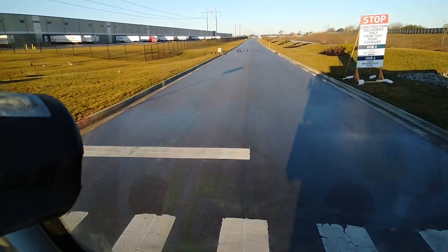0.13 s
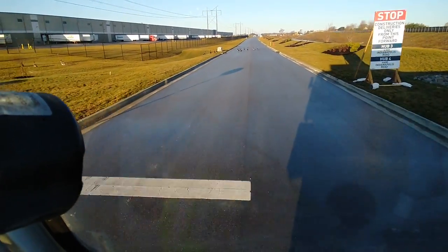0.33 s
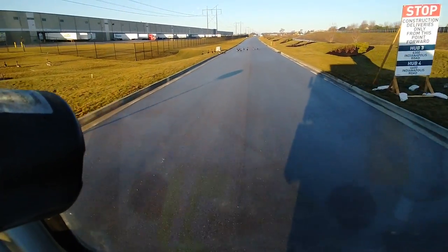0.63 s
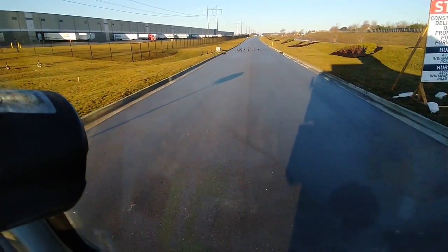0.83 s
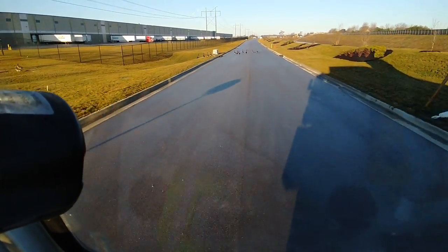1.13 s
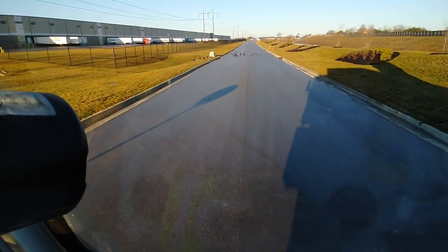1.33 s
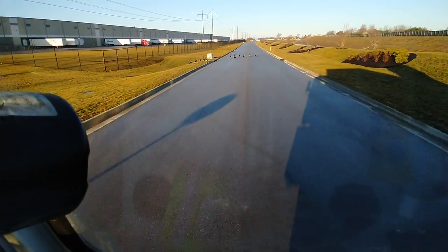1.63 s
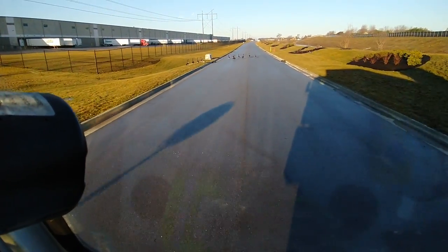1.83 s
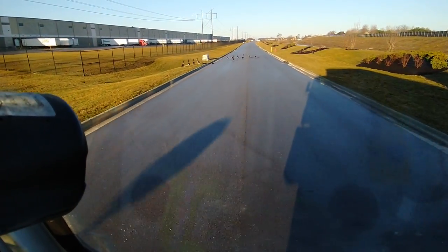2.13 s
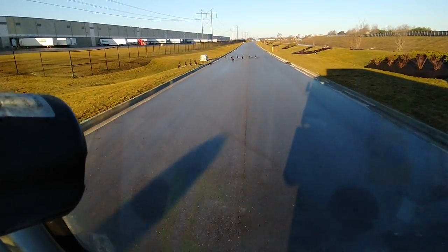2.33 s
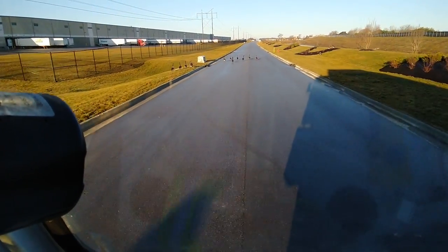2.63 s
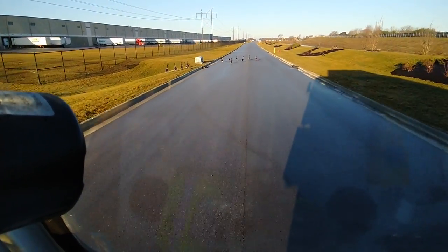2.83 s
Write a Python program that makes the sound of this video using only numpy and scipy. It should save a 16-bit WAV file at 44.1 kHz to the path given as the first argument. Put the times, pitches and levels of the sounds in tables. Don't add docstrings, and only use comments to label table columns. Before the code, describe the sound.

A heavy vehicle's engine drones inside its cab, pitch creeping upward for three seconds over bassy tyre rumble, rattly valve clatter and dull bump booms. Leaking air hisses strongly at 0 s, fades, and gusts again near 1.1 s as a floor panel buzzes. Tiny squeaks come at 0.2 and 0.6-0.7 s. From 2 s seal air whistles faintly louder; trim creaks at 2.1-2.6 s; squeaks return at 2.9 s.

```python
import sys
import numpy as np
from scipy import signal
from scipy.fft import rfft, irfft
from scipy.io import wavfile
from scipy.ndimage import uniform_filter1d

SR = 44100
rng = np.random.default_rng(int(sys.argv[2]) if len(sys.argv) > 2 else 0)


def generate_wav(sig):
    pcm = np.round(np.clip(np.atleast_2d(sig).T, -1, 1) * 32767).astype(np.int16)
    wavfile.write(sys.argv[1], SR, pcm)


def ratio(d):
    e = np.asarray(d, float) / 20
    return 10 ** e


N = 130977

# time in seconds, level in dB.
LEAK_GUSTS = [(0, -37.5), (.1, -45.5), (.3, -48), (.6, -55), (.76, -48), (.98, -51.5), (1.06, -40),
              (1.17, -41), (1.24, -48), (1.34, -43), (1.5, -47), (1.75, -50), (2.0, -49), (2.07, -47),
              (2.4, -48), (2.97, -54)]
# frequency in Hz, density in dB per Hz.
LEAK_SPECTRUM = [(1500, -7), (3000, 1.5), (4500, -2), (6000, -4.5), (7300, -11), (8600, -9.5)]
# start in seconds, length in seconds, level in dB, frequency in Hz.
BUMPS = [(.08, 0.14, -23, 150.7), (0.36, 0.098, -23, 125.6), (0.587, 0.099, -21.5, 175.2),
         (.58, 0.1, -21.5, 126.5), (.8, 0.11, -23.5, 130), (.8, 0.112, -26.5, 200), (1.65, 0.1, -26, 200),
         (1.8, 0.065, -29, 170), (2.2, .12, -23, 151.8), (2.7, 0.15, -24, 198.2),
         (2.74, 0.091, -22.5, 97.8), (2.9, 0.057, -24.5, 96.6), (1.07, 0.1, -40, 730),
         (.96, 0.078, -45, 705), (1.0, .07, -40, 450), (1.0, .06, -39, 480), (1.13, 0.076, -39, 425),
         (1.18, .07, -38, 545), (1.52, .08, -41.5, 565), (1.5, 0.2, -30, 200), (1.35, 0.16, -31.5, 170),
         (.3, 0.088, -30, 185), (2.6, 0.1, -24, 148), (1.0, .12, -30, 205), (1.6, .06, -43, 640),
         (0.7, 0.067, -40, 700), (.2, 0.045, -31, 160), (.48, 0.062, -27, 120), (.48, 0.083, -27, 186.6),
         (1.86, 0.091, -38.5, 415), (1.24, 0.09, -33.5, 294), (.5, .25, -44.5, 560), (.42, 0.14, -46, 700),
         (1.85, 0.056, -41.5, 670), (1.95, 0.088, -43.5, 560), (.03, 0.21, -34.5, 276.3),
         (.38, 0.074, -33, 150), (1.78, 0.075, -25.5, 137.4)]
# start in seconds, length in seconds, level in dB, pitch in Hz.
SQUEAKS = [(.055, 0.025, -50, 3590), (.11, 0.04, -50.5, 7140), (0.118, .04, -49.5, 5660),
           (.125, .05, -50, 5520), (.208, .03, -40.5, 3480), (.218, 0.03, -43.5, 3250),
           (0.214, 0.014, -43.5, 7050), (.226, 0.022, -44.5, 6850), (.365, 0.045, -52, 5470),
           (.372, .04, -52, 5600), (0.597, .028, -50, 7140), (.604, 0.024, -46, 4410),
           (0.69, 0.028, -43, 3480), (.691, 0.0158, -41, 7080), (0.706, 0.014, -45, 6980),
           (.71, 0.0078, -48, 4100), (.704, 0.013, -43, 3290), (0.632, 0.027, -37.5, 1796),
           (2.893, 0.022, -39, 4430), (2.911, 0.012, -39, 4400), (2.904, 0.018, -45, 4150),
           (2.919, 0.03, -47, 4330)]
# frequency in Hz, width in Hz.
TRIM_MODES = [(497, 35), (695, 45), (1670, 130), (2670, 170)]
# start in seconds, length in seconds, then levels in dB of low modes, third mode, top mode.
CREAKS = [
    (2.1, .015, -38.5, -41, -44),
    (2.186, 0.011, -61, -47, -32.5),
    (2.274, 0.029, -31.5, -31, -35.5),
    (2.332, 0.0055, -34.5, -34, -40),
    (2.363, 0.0079, -41, -42, -30),
    (2.38, 0.0073, -48, -46, -40),
    (2.454, 0.02, -32.5, -30, -42),
    (2.51, 0.011, -43, -41, -49.5),
    (2.545, 0.01, -43, -50, -38.5),
    (2.614, 0.012, -35, -29.5, -42),
]
# frequency in Hz, density in dB per Hz.
RUMBLE_SPECTRUM = [(20, -31.5), (45, -22.5), (64, -16.5), (86, -2), (190, -2.5), (340, -13.5), (680, -22),
                   (1000, -36)]
# frequency in Hz, width in Hz, lift in dB.
CAB_MODES = [(128.7, 18, 3), (156.7, 25, 4.5), (201.2, 12, 5), (289, 48, 1.5), (426, 29, 4.5),
             (559.5, 30, 7.5), (708, 22, 6), (747, 37, 3.5)]
# frequency in Hz, density in dB per Hz.
CLATTER_SPECTRUM = [(700, -4), (1020, -9.5), (1720, -8.5), (2470, -9), (3350, -17.5), (3800, -23),
                    (7450, -29.5), (8600, -31.5)]
# frequency in Hz, width in Hz, lift in dB.
PANEL_MODES = [(1065, 36, 3), (1710, 70, 6), (1900, 70, 5), (2413, 36, 7), (2600, 40, 4), (3004, 45, 5),
               (3290, 35, 5), (3460, 28, 7), (4023, 35, 8), (4410, 50, 4), (4721, 14, 4), (4803, 45, 5),
               (5570, 35, 3)]
# time in seconds, engine load in dB, road roughness in dB, valve clatter in dB.
DRIVE = [(0, -1, 2, 0), (.2, -2, 0.5, -0.5), (.4, -9, 0.5, -0.5), (.6, 0.5, -0.5, 0), (.9, -3, -0.5, -0.5),
         (1.2, -0.5, 0, 0.7), (1.4, -1.5, -0.5, 1.5), (1.6, 0, -1.5, 1), (1.8, -2, 0, 0.5),
         (2.1, 0, -1, 0.3), (2.4, -4, -1.5, 0.5), (2.65, -1, 0, 0), (2.97, -0.5, 0, 0.5)]
# multiple of the firing rate, level in dB rms.
ENGINE_ORDERS = [(1 / 2, -54.5), (1, -32), (4 / 3, -34.5), (5 / 3, -37.5), (2, -29.5), (7 / 3, -40.5),
                 (2.5, -52.5), (4.5, -49)]
# frequency in Hz, gain in dB.
BAND_EDGE = [(7300, 0), (7700, -4.5), (7930, -13.5), (8000, -19), (8070, -16.5), (8300, -21), (8420, -36.5),
             (8600, -57)]


def evened(x):
    return x / np.sqrt(np.mean(x ** 2) + 1e-20)


def read(points, hz):
    point_hz, db = np.transpose(points)
    return np.interp(np.log(hz + 1), np.log(point_hz + 1), db)


def curve(table, column):
    rows = np.array(table)
    return np.interp(np.arange(N) / SR, rows[:, 0], rows[:, column])


def add(mix, start_s, sound):
    part = mix[round(start_s * SR):][:len(sound)]
    part += sound[:len(part)]


def slow(top_hz):
    t = np.arange(0, N + 64, 64) / SR
    wave = 0
    for hz in np.geomspace(0.4, top_hz, 24):
        wave = wave + np.sin(2 * np.pi * (hz * t + rng.random())) / np.sqrt(hz)
    return np.interp(np.arange(N) / SR, t, evened(wave))


def colour(x, spectrum, modes):
    hz = np.fft.rfftfreq(N, 1 / SR)
    lift_db = sum(db / (1 + (2 * (hz - mode_hz) / width_hz) ** 2) for mode_hz, width_hz, db in modes)
    return evened(irfft(rfft(x) * ratio(read(spectrum, hz) + lift_db), N))


def ring(x, hz, width_hz):
    turn = np.exp(2j * np.pi * hz * np.arange(len(x)) / SR)
    pole = np.exp(-np.pi * width_hz / SR)
    return 2 * (turn * signal.lfilter([1 - pole], [1, -pole], x / turn)).real


def patchy(x, depth_db):
    z = signal.stft(x, nperseg=512, noverlap=384)[2]
    patches = rng.standard_normal(z.shape[::-1]).T
    patches = uniform_filter1d(patches, size=4, axis=0)
    patches = evened(uniform_filter1d(patches, size=30, axis=1))
    return evened(signal.istft(z * ratio(depth_db * patches), nperseg=512, noverlap=384)[1][:N])


def seal():
    centre_hz, width_hz, level_db = 6570, 3100, -61
    lift_s, lift_db, rise_s = 2.03, 10, 0.06
    air = ring(ring(rng.standard_normal(N), centre_hz, width_hz), centre_hz, width_hz)
    lifted = np.clip((np.arange(N) / SR - lift_s) / rise_s, 0, 1)
    return ratio(level_db + lift_db * lifted) * evened(air)


def leak():
    spectrum = [(500, -53.0)] + list(LEAK_SPECTRUM) + [(9000, -78.5)]
    air = colour(rng.standard_normal(N), spectrum, [(4970, 60, 4.2), (5520, 85, 6.3)])
    return ratio(curve(LEAK_GUSTS, 1) + 1.6 * slow(25)) * air


def buzz():
    centre_hz, width_hz, level_db = 710, 90, -47
    peak_s, spread_s = 1.0, 0.8
    shake = ring(ring(rng.standard_normal(N), centre_hz, width_hz), centre_hz, 2 * width_hz)
    swell = np.exp(-((np.arange(N) / SR - peak_s) / spread_s) ** 2)
    return ratio(level_db + 2.9 * slow(9)) * swell * evened(shake)


def bump(length_s, db, hz):
    t = np.arange(0, length_s, 1 / SR)
    arch = np.sin(np.pi * (t / length_s) ** 0.96)
    return np.sqrt(2) * ratio(db) * arch * np.sin(2 * np.pi * hz * t)


def squeak(length_s, db, hz):
    width_hz, fuzz_share, pitch_waver, arch_power = 180, 0.3, 0.004, 0.7
    t = np.arange(0, length_s, 1 / SR)
    noise = ring(ring(rng.standard_normal(4000), hz, width_hz), hz, 3 * width_hz)
    fuzz = evened(noise)[-len(t):]
    waver = evened(uniform_filter1d(np.roll(fuzz, 200) ** 2 - 1, size=150))
    tone = np.sqrt(2) * np.sin(2 * np.pi * np.cumsum(hz * (1 + pitch_waver * waver)) / SR)
    arch = np.sin(np.pi * t / length_s) ** arch_power
    return ratio(db) * arch * ((1 - fuzz_share) * tone + fuzz_share * fuzz)


def creak(length_s, low_db, third_db, top_db):
    slips_per_s, slip_depth = 120, 0.25
    t = np.arange(4000) / SR
    rub = 1 + 0.5 * evened(uniform_filter1d(rng.standard_normal(4000), size=90))
    arch = np.sin(np.pi * np.minimum(t / length_s, 1)) ** 0.5
    stroke = rub * arch * (1 + slip_depth * np.cos(2 * np.pi * slips_per_s * t))
    out = 0
    for (hz, width_hz), db in zip(TRIM_MODES, (low_db, low_db - 5, third_db, top_db)):
        mode = ring(stroke * np.sin(2 * np.pi * hz * t), hz, width_hz)
        out = out + np.sqrt(2) * ratio(db) * mode / abs(mode).max()
    return out


def rumble():
    lumps_db = curve(DRIVE, 2) + 0.56 * slow(12)
    spectrum = [(5, -70.5)] + list(RUMBLE_SPECTRUM) + [(1600, -85.0)]
    return ratio(-25 + lumps_db) * colour(rng.standard_normal(N), spectrum, CAB_MODES)


def firings():
    start_hz, rise_hz_per_s, wander = 74.07, 7.25, 0.0026
    rate_hz = (start_hz + rise_hz_per_s * np.arange(N) / SR) * (1 + wander * slow(6))
    return np.cumsum(rate_hz) / SR


def clatter(turns):
    pulsed_share, tick_share, ticks_per_s, level_db = 0.092, 0.26, 900, -37
    gate = 1 - pulsed_share + pulsed_share * 3 * np.exp(-(turns % 1) / 0.3)
    tick_size = ratio(3.0 * np.minimum(rng.exponential(1, N), 4))
    ticks = tick_size * (rng.random(N) < ticks_per_s / SR) * rng.choice([-1, 1], N)
    puffs = evened(gate * rng.standard_normal(N))
    strikes = np.sqrt(1 - tick_share) * puffs + np.sqrt(tick_share) * evened(ticks)
    spectrum = [(350, -44.0)] + list(CLATTER_SPECTRUM) + [(9000, -89)]
    ringing = patchy(colour(strikes, spectrum, PANEL_MODES), depth_db=1.28)
    return ratio(level_db + curve(DRIVE, 3) + 0.5 * slow(14)) * ringing


def drone(turns):
    orders = 0
    for multiple, db in ENGINE_ORDERS:
        level = np.sqrt(2) * ratio(db + 1.5 * slow(6.2))
        orders = orders + level * np.sin(2 * np.pi * (multiple * turns + rng.random()))
    return ratio(curve(DRIVE, 1)) * orders


def scene():
    events = np.zeros(N)
    for rows, source in ((BUMPS, bump), (SQUEAKS, squeak), (CREAKS, creak)):
        for start_s, *settings in rows:
            add(events, start_s, source(*settings))
    turns = firings()
    air = seal() + leak()
    return (air + buzz() + events + rumble() + clatter(turns) + drone(turns))[None]


def top_cut(x):
    return signal.sosfilt(signal.butter(12, 8410, fs=SR, output="sos"), x)


def record(dry):
    hz = np.fft.rfftfreq(2048, 1 / SR)
    taps = np.roll(irfft(ratio(read(BAND_EDGE, hz))), 1024) * np.hanning(2048)
    mix = signal.oaconvolve(dry, taps[None], "same")
    return top_cut(mix)


dry = scene()
out = record(dry)
generate_wav(out)
```